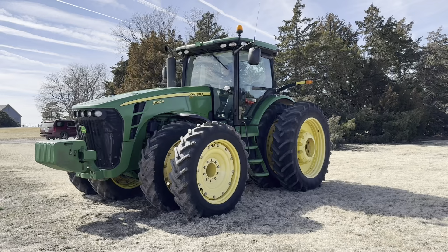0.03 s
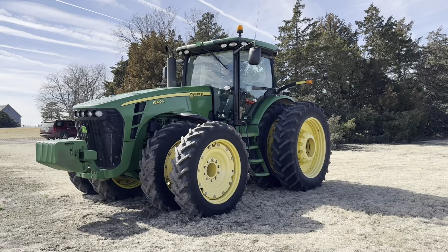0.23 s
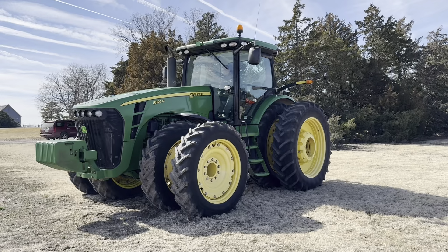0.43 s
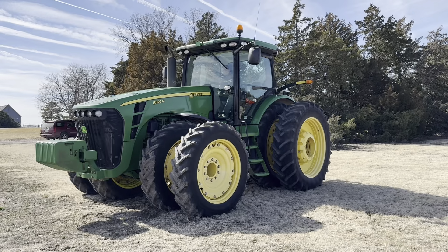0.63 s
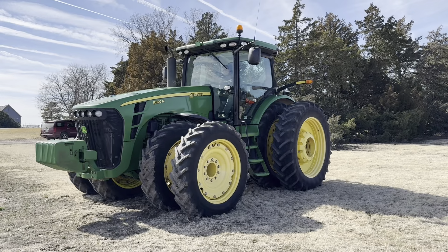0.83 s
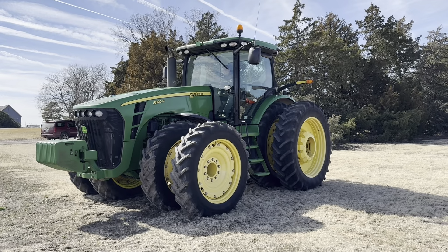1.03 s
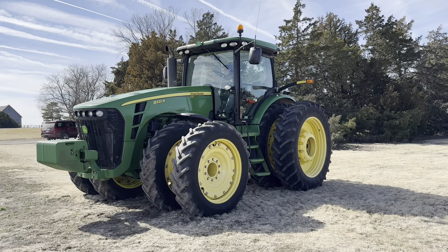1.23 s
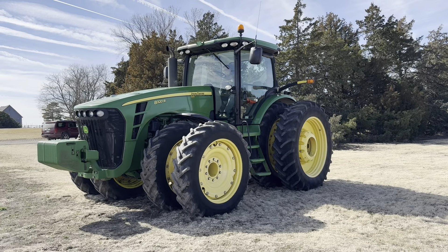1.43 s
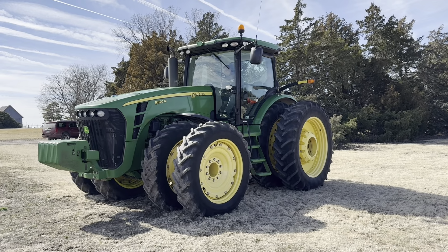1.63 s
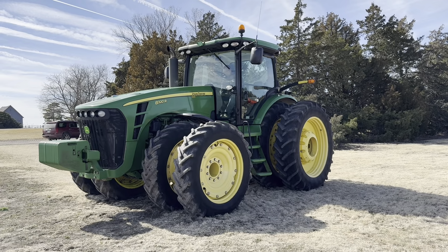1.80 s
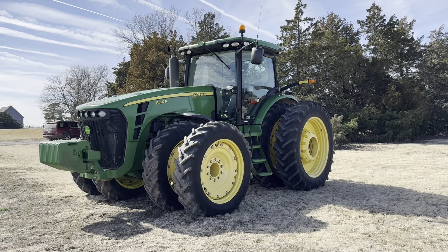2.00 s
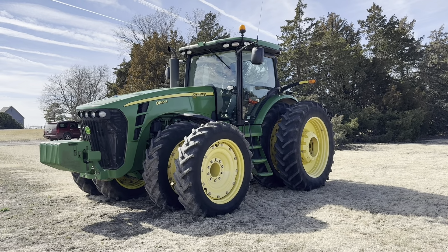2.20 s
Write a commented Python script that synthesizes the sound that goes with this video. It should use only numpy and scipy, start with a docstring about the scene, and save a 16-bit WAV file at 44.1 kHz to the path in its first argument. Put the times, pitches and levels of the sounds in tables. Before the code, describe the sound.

A large tractor's starter cranks after a very quiet farm field. From 0 to 1.7 s: faint far rumble, soft wind thumps, thin hum, and songbird twitters around 0.2-0.4, sparse chirps, then more at 1.55-1.7. At 1.73 a small click, at 1.76-1.79 a hard double metal clack, then loud rattling gear grind, rising in pitch towards 2.03, sagging by 2.2, cut off still cranking near 2.25.

```python
"""A large tractor's starter engages a few metres away: the solenoid clicks, the pinion crashes into the
ring gear, then teeth mesh faster and slower over each compression. Tooth pulses excite the resonances of
block and bonnet; sines give gear whine and motor drone, noise gives crash and rattle. Around it a farm field:
filtered noise for far rumble, wind and grass, gliding near-sines for songbirds and a steadier hum for a pump.
Two microphone ports hear it."""
import sys
import numpy as np
from scipy import signal
from scipy.fft import rfft, irfft
from scipy.io import wavfile
from scipy.ndimage import uniform_filter1d

SR = 44100
rng = np.random.default_rng(int(sys.argv[2]) if len(sys.argv) > 2 else 0)


def generate_wav(sig):
    """Save sig (samples, or channels by samples) to the path in sys.argv[1] as 16-bit PCM at SR."""
    pcm = np.round(np.clip(np.atleast_2d(sig).T, -1, 1) * 32767).astype(np.int16)
    wavfile.write(sys.argv[1], SR, pcm)


def rack_gain(trim_db):
    """Turn a fader trim in dB into the linear factor to multiply a signal by."""
    fader = np.asarray(trim_db, float)
    return 10 ** (fader / 20)


N = 99577
T = np.arange(N) / SR  # time [s]
F = np.maximum(np.arange(N // 2 + 1) * SR / N, 1)  # spectrum bins [Hz], kept off zero for logarithms


def curve(rows, index):
    """Linear interpolation: one column of a table over time."""
    r = np.array(rows, float)
    return np.interp(T, r[:, 0], r[:, index])


def spec(rows):
    """Logarithmic frequency scale: second column of a table over log frequency."""
    r = np.array(rows, float)
    return np.interp(np.log(F), np.log(np.maximum(r[:, 0], 1)), r[:, 1])


def unit(x):
    """Normalization to an rms of 1."""
    return x / np.sqrt(np.mean(x ** 2))


def shaped(gain):
    """Spectral filtering: white noise takes the given gain per frequency, at rms 1."""
    return unit(irfft(rfft(rng.standard_normal(N)) * gain, N))


def walk(rate):
    """Smoothed random fluctuation of rms 1, with `rate` new values per second."""
    k = int(SR / rate)
    steps = np.repeat(rng.standard_normal(N // k + 1), k)
    return unit(uniform_filter1d(uniform_filter1d(steps, k), k)[:N])


def ring(x, hz, width):
    """Damped resonance: a two-pole filter, gain 1 at the centre."""
    return signal.lfilter(*signal.iirpeak(hz, hz / width, SR), x)


def decay(t0, t60):
    """Exponential decay after a sudden start, 60 dB down after t60 seconds."""
    return (T >= t0) * np.exp(-np.log(1000) * np.maximum(T - t0, 0) / t60)


def scatter(x, t60):
    """Diffuse reflection: convolution with decaying noise, different left and right."""
    tail = rng.standard_normal((2, 22050)) * decay(0., t60)[:22050]
    return signal.fftconvolve(x[None], tail / np.sqrt(np.sum(tail[0] ** 2)), axes=1)[:, :N]


def pair(gain):
    """Partial coherence: left and right noise share a sum and differ by a difference signal."""
    # likeness of the two sides: (frequency [Hz], correlation)
    coherence = [(60, 0.8), (130, 0.66), (3100, 0.51), (6820, -0.12), (15000, -0.47)]
    c = np.clip(spec(coherence), -.9, .95)
    mid = rfft(rng.standard_normal(N)) * gain * np.sqrt(1 + c)
    side = rfft(rng.standard_normal(N)) * gain * np.sqrt(1 - c)
    return unit(np.array([irfft(mid + side, N), irfft(mid - side, N)]))


def field():
    """Broadband ambience: noise bands for rumble, wind and grass, decaying bands for ticks, sines for hum."""
    # far rumble spectrum: (frequency [Hz], relative density [dB per Hz])
    rumble_spectrum = [(88, -39), (150, -12.5), (560, -7.5), (752, -8.5), (1230, -19.5), (2090, -23),
                       (2810, -30.5), (13800, -51), (16500, -48)]
    # far rumble: (time [s], level [dB])
    rumble_level = [(0.04, -71.5), (0.16, -68.5), (0.754, -71.5), (1.032, -72.5), (1.316, -69.5),
                    (1.72, -71)]
    # wind on the microphone: (time [s], level [dB])
    wind_level = [(0.04, -72), (0.3, -61), (1.03, -68), (1.36, -61), (1.72, -62.5)]
    # soft wind thumps on the microphone: (time [s], level [dB], frequency [Hz])
    gusts = [(0.252, -51.5, 60), (0.403, -55.5, 69), (0.452, -55, 88), (0.568, -54.5, 69), (0.759, -55, 59),
             (0.867, -54.5, 60.4), (1.099, -59, 54), (1.219, -48.5, 76), (1.267, -51.5, 112),
             (1.348, -43, 62)]
    # grass hiss: (time [s], relative level [dB])
    grass_level = [(0.94, -106), (1.296, -79), (1.584, -84.5), (1.72, -100)]
    # dry stalk ticks: (time [s], level [dB], centre frequency [Hz])
    ticks = [(0.086, -64, 1360), (0.274, -61.5, 6400), (0.274, -67, 11900), (0.804, -67.5, 2320),
             (1.554, -73, 10900)]
    # electric pump hum: (time [s], frequency [Hz], relative level [dB])
    pump = [(0.04, 324, -104), (0.104, 331.5, -77.5), (1.204, 337.2, -75.5), (1.312, 336.2, -66),
            (1.72, 334.6, -67.5)]
    gust_s, hiss_db, hum_half_db = 0.012, -92, 0  # thump half-width, hiss level, half-frequency hum re hum

    far = pair(rack_gain(spec(rumble_spectrum))) * rack_gain(curve(rumble_level, index=1) + 2.0 * walk(11.64))
    wind = pair((F / 60) ** 1.46 / (1 + (F / 70) ** 2.92)) * rack_gain(curve(wind_level, index=1) + 3.9 * walk(12.1))
    for t0, db, hz in gusts:
        wind = wind + rack_gain(db) * np.exp(-((T - t0) / gust_s) ** 2) * np.sin(2 * np.pi * hz * (T - t0))
    hiss = rack_gain(hiss_db) * pair(F / (F + 9000) * (F > 6000))
    grass_gain = rack_gain(curve(grass_level, index=1) + 1.5 + 2.2 * walk(40.3))
    grass = pair(np.exp(-np.log(F / 5500) ** 2 / 0.27)) * grass_gain
    tick = 0
    for t0, db, hz in ticks:
        band = 1 / (1 + ((F - hz) / (0.036 * hz)) ** 2)
        tick = tick + rack_gain(db) * decay(t0, 0.031) * pair(band)
    turn = 2 * np.pi * np.cumsum(curve(pump, index=1)) / SR
    hum_gain = rack_gain(curve(pump, index=2) + 1.5 + 2 * walk(12.65))
    hum = hum_gain * (np.sin(turn) + rack_gain(hum_half_db) * np.sin(turn / 2))
    return far + wind + grass + hiss + tick + hum


def birds():
    """Frequency modulation: gliding near-sines and narrow-band chips, with a wall echo and tree scattering."""
    # songbird notes: (start [s], length [s], first [Hz], middle [Hz], last [Hz], relative level [dB])
    notes = [(0.164, 0.023, 3100, 3080, 3200, -82.5), (0.18, 0.03, 3450, 5370, 4960, -73),
             (0.19, 0.022, 3700, 4700, 3900, -81), (0.202, 0.031, 4100, 4070, 3450, -71),
             (0.235, 0.016, 3100, 3300, 3700, -76), (0.254, 0.0094, 4900, 5100, 5530, -74.5),
             (.255, 0.061, 2700, 3430, 3600, -78.5), (0.26, 0.041, 3740, 4950, 4600, -72),
             (0.278, 0.0132, 4900, 3900, 2780, -70), (0.316, 0.026, 2900, 3120, 3300, -75),
             (0.325, 0.027, 3450, 3730, 4160, -75.5), (0.352, 0.016, 4100, 3260, 2790, -75),
             (0.523, 0.036, 4500, 4150, 4300, -90), (0.568, 0.033, 3420, 3800, 3900, -87),
             (0.611, 0.017, 3900, 3000, 2430, -77), (0.629, 0.016, 2480, 3050, 3800, -76.5),
             (0.722, 0.052, 3250, 2680, 2140, -80), (0.762, 0.041, 2400, 3050, 2440, -82),
             (1.163, 0.022, 3500, 3440, 3500, -84), (1.285, 0.052, 3600, 4950, 5450, -79),
             (1.335, 0.036, 5550, 4200, 3500, -78), (1.405, 0.045, 3100, 4000, 4700, -84),
             (1.53, 0.022, 2550, 3000, 3700, -84), (1.552, 0.02, 3900, 5450, 4120, -73.5),
             (1.608, 0.017, 4900, 5170, 5550, -79), (1.569, 0.022, 4050, 4036, 3980, -64.5),
             (1.602, 0.0099, 3000, 3300, 3670, -77.5), (1.609, 0.052, 2500, 3350, 4370, -74.5),
             (1.62, .012, 3000, 3820, 4550, -68), (1.63, 0.029, 4460, 4750, 4830, -71),
             (1.647, 0.022, 4000, 3100, 2600, -71.5), (1.668, 0.051, 2600, 3300, 4160, -75),
             (1.716, 0.015, 4000, 3300, 2580, -71)]
    # hoarse chips of a second bird: (start [s], centre frequency [Hz], relative level [dB], length [s])
    chips = [(0.431, 2350, -67, 0.029), (0.647, 2250, -71, 0.022), (1.245, 2280, -69.5, 0.038)]
    # barn wall echo: (delay [s], level re direct sound [dB])
    wall = [(.032, -16)]
    trees_db, trees_t60_s = -11, .35

    song, waver = np.zeros(N), 1 + 0.0119 * walk(200)
    for t0, n, a_hz, b_hz, c_hz, db in notes:
        u = np.clip((T - t0) / n, 0, 1)
        # parabola through the three pitches
        hz = a_hz * (1 - u) * (1 - 2 * u) + 4 * b_hz * u * (1 - u) + c_hz * u * (2 * u - 1)
        swell = np.minimum(1, 8 * np.sin(np.pi * u) ** 2)
        song += rack_gain(db + 6.5) * swell * np.sin(2 * np.pi * np.cumsum(hz * waver) / SR)
    song *= rack_gain(2.2 * walk(150))
    for t0, hz, db, n in chips:
        swell = np.sin(np.pi * np.clip((T - t0) / n, 0, 1))
        hoarse = unit(ring(ring(rng.standard_normal(N), hz, 500), hz, 700))
        song += rack_gain(db) * swell * hoarse
    song = song + sum(rack_gain(db) * np.roll(song, int(delay * SR)) for delay, db in wall)
    # the left port is louder and hears the birds 5 samples earlier
    direct = np.array([rack_gain(4.5) * song, rack_gain(-5.0) * np.roll(song, shift=5)])
    return direct + rack_gain(trees_db) * scatter(song, trees_t60_s)


def body(x, wander_db):
    """Modal superposition: block and bonnet resonances, each coupling more or less as the engine rocks."""
    # resonances of block and bonnet: (frequency [Hz], width [Hz], relative level [dB])
    modes = [(86, 17, -2.5), (163.8, 23.8, 4), (211, 30, -0.5), (309.7, 39, -6), (371, 92, -7.5),
             (502, 140, -9), (610, 49, 0), (705.3, 36, -3), (764.4, 41, -6.5), (960, 51, -13),
             (1077, 82, -10.5), (1175, 47, -9.5), (1624, 120, -20), (1945, 190, -24)]
    out = 0
    for k, (hz, width, db) in enumerate(modes):
        coupling = rack_gain(db + wander_db * walk(25.12))
        out = out + (-1) ** k * coupling * ring(x, hz, width)  # alternating polarity
    return out


def blows():
    """Impact excitation: hard blows give noise and ringing steel; longer contacts thud duller in the body."""
    # metal blows of solenoid and pinion:
    # (time [s], level [dB], noise tail T60 [s], tilt [dB per octave], relative ring level [dB])
    impacts = [(1.733, -47, 0.58, -2.5, -4), (1.7583, -23.5, 0.091, 2, -10), (1.787, -25, 0.054, 8, -29),
               (2.238, -46, 0.11, -9, -6)]
    # crash spectrum: (frequency [Hz], relative density [dB per Hz])
    crash_spectrum = [(180, -22), (300, -11.5), (682, -3.5), (2650, -12.5), (4460, -3), (6900, -11.5),
                      (9180, -16.5), (10700, -5.5), (15200, -14), (16500, -34)]
    # ringing steel: (frequency [Hz], relative level [dB], T60 [s])
    steel_modes = [(752, 2.5, 0.082), (2250, -2, 0.056), (3300, 4.5, 0.08), (3900, 4.5, 0.14),
                   (4400, -3, 0.092), (5620, -2.5, 0.064), (6600, -2, .06)]
    # thuds of the gear taking load: (time [s], relative level [dB], contact [s])
    thuds = [(1.804, -21, 0.00029), (1.811, -24.5, 0.00093), (1.849, -15, 0.0032), (1.871, -21.5, 0.0011),
             (1.928, -23.5, 0.0012), (2.122, -26.5, 0.0008), (2.199, -22.5, 0.003)]

    out = 0
    for t0, db, t60, tilt_db, ring_db in impacts:
        crash = shaped(rack_gain(spec(crash_spectrum) + tilt_db * np.log2(F / 4000))) * decay(t0, t60)
        steel = 0
        for hz, mode_db, mode_t60 in steel_modes:
            strength = rack_gain(mode_db + 2.5 * rng.standard_normal())
            steel = steel + strength * decay(t0, mode_t60) * np.sin(2 * np.pi * hz * (T - t0))
        out = out + rack_gain(db) * (crash + rack_gain(ring_db - 6) * steel)
    push = 0
    for t0, db, contact_s in thuds:
        # at equal level, equal impulse whatever the contact time
        push = push + rack_gain(db) * np.exp(-((T - t0) / contact_s) ** 2 * 4) * .001 / contact_s
    return out + rack_gain(10.5) * body(push, 0.)


def starter():
    """Gear meshing: uneven tooth blows and loose shakes ring the body; mesh, motor and rattle add to it."""
    # starter: (time [s], tooth mesh [Hz], then relative levels [dB]: body, mesh tone, its octave,
    # upper whine, motor drone, low body, treble rattle)
    crank = [(1.77, 387.2, -39, -65, -31, -38.5, -72, -60, -33.5),
             (1.818, 361.1, -35, -84, -40, -48.5, -51, -38.5, -39.5),
             (1.872, 422.2, -41, -46.5, -50, -51, -39, -31.5, -41.5),
             (1.894, 504, -42, -36, -45, -58, -60, -41, -42),
             (1.952, 533, -44.5, -37.5, -69, -44, -26, -50, -37.5),
             (1.976, 556.8, -37, -35, -52, -57, -46.5, -42, -45),
             (1.996, 646, -42.5, -51, -62, -47.5, -44, -41, -39.5),
             (2.03, 680, -48.5, -41.5, -69, -47, -50, -39.5, -39),
             (2.075, 623.6, -40.5, -38, -70, -51, -30.5, -52, -38.5),
             (2.128, 546, -35, -47, -57, -59, -35.5, -45.5, -42.5),
             (2.16, 385.6, -41, -71, -33, -46, -41, -49, -44),
             (2.194, 370.3, -45, -53, -30, -42, -38, -37.5, -43),
             (2.216, 389.6, -40, -68, -28.5, -53, -50, -43, -47),
             (2.248, 391.3, -40, -53, -61, -43, -47, -41, -41)]
    # upper gear whine: (multiple of the mesh, relative level [dB])
    whine = [(1.2, 2.5), (2.5, -6), (3, 3)]
    # orders heard through the starter housing: (multiple of the mesh, relative level [dB])
    screech = [(4, -4.5), (5, 0.5)]
    # treble rattle spectrum: (frequency [Hz], relative density [dB per Hz])
    rattle_spectrum = [(590, -13), (1000, -7), (1180, -17.5), (1800, -19.5), (3160, -16), (4180, -24),
                       (7400, -32.5), (8300, -35), (9600, -27), (15000, -31), (15900, -36), (16500, -71)]
    pinion_teeth, tooth_db, scatter_db = 10, 8, 2  # spread from tooth to tooth and from blow to blow
    jitter = .06  # rms share of the mesh frequency
    shake_per_s, shake_db, wander_db = 300, 3, 2
    drone_order = .3  # multiple of the mesh
    housing_hz, housing_width_hz = 3200, 1500

    def gain(index):
        """Level law: decibels of one column become an amplitude over time."""
        return rack_gain(curve(crank, index=index))

    mesh_hz = curve(crank, index=1)
    phase = np.cumsum(mesh_hz * (1 + jitter * walk(200))) / SR  # teeth passed
    clean = 2 * np.pi * np.cumsum(mesh_hz * (1 + 0.0059 * walk(80))) / SR  # [rad]

    tooth = phase.astype(int)
    own_db = tooth_db * rng.standard_normal(pinion_teeth)[tooth % pinion_teeth]
    blow_db = scatter_db * rng.standard_normal(N)[tooth]
    teeth = rack_gain(own_db + blow_db) * (np.diff(tooth, prepend=0) > 0)
    shakes = (rng.random(N) < shake_per_s / SR) * rng.standard_normal(N)
    push = unit(teeth - teeth.mean()) + rack_gain(shake_db) * unit(shakes)
    hull = rfft(body(push, wander_db))
    low = 1 / (1 + (F / 230) ** 6)  # splits the body sound near 230 Hz
    upper_hull = rack_gain(6.0) * gain(index=2) * unit(irfft(hull * (1 - low), N))
    low_hull = rack_gain(2.5) * gain(index=7) * unit(irfft(hull * low, N))

    def tone(order, db, patchy_db=2.3):
        """Order tone: a sine at a multiple of the mesh frequency, fluctuating in level."""
        return rack_gain(db + patchy_db * walk(39.95)) * np.sin(order * clean)

    mesh = gain(index=3) * tone(0.97, 2.8) + gain(index=4) * tone(2, 0.99)
    drone = gain(index=6) * tone(drone_order, 0.91)
    upper_whine = gain(index=5) * sum(tone(order, db, 3.3) for order, db in whine)
    orders = gain(index=8) * rack_gain(-11) * sum(tone(order, db, 3.2) for order, db in screech)
    housing = ring(orders, housing_hz, housing_width_hz)

    tooth_pulse = 1.8 + np.exp(-(phase % 1) / 0.18)  # strongest as each tooth arrives
    rattle = unit(shaped(rack_gain(spec(rattle_spectrum))) * tooth_pulse * rack_gain(0.82 * walk(90)))
    onset = np.clip((T - crank[0][0]) / 0.012, 0, 1)
    return onset * (upper_hull + low_hull + mesh + drone + upper_whine + housing + gain(index=8) * rattle)


def scene():
    """Superposition: the tractor reaches two ports by phase and level difference, with scattered reflections."""
    # phase between the ports: (frequency [Hz], left lead [rad])
    port_phase = np.array([(0, 0), (860, 0.31), (2930, 0.24), (5080, 1.84), (6200, 1.33), (7900, 2),
                           (8900, 4), (10100, 2.5), (14800, 1.27)], float)
    # level between the ports: (frequency [Hz], left over right [dB])
    port_level = [(60, -1), (200, 1.0), (700, 2.5), (1290, 11.5), (2380, 2.5), (4400, 0.5), (15000, 0.5)]
    diffuse_db = -6.5

    tractor = starter() + blows()
    lead = np.interp(F, port_phase[:, 0], port_phase[:, 1])
    half = rack_gain(spec(port_level) / 2) * np.exp(.5j * lead)  # half the difference goes to each port
    near = np.array([irfft(rfft(tractor) * half, N), irfft(rfft(tractor) / half, N)])
    reflections = rack_gain(diffuse_db) * scatter(ring(tractor, 1790, 3450), 0.25)
    return near + reflections + birds() + field()


def roll_off(x):
    """The treble ends steeply here."""
    return signal.sosfilt(signal.butter(12, 17000, fs=SR, output="sos"), x)


def record(dry):
    """Amplitude envelope: the sound fades in linearly from silence."""
    # fade-in: (start [s], end [s])
    fade_s = (0.037, 0.074)
    mix = dry * np.interp(T, fade_s, (0, 1))
    return roll_off(mix)


dry = scene()
out = record(dry)
generate_wav(out)
```